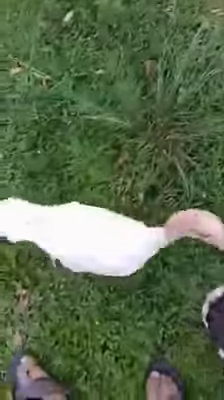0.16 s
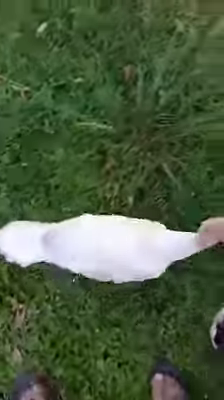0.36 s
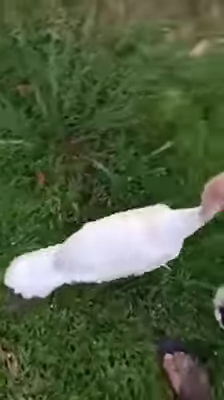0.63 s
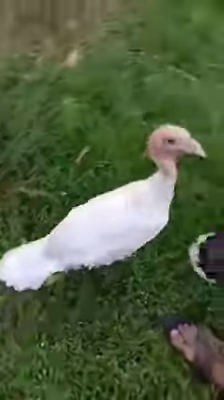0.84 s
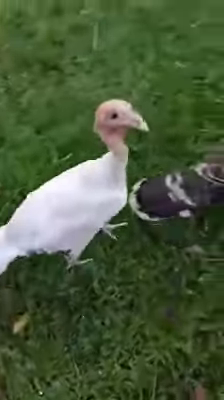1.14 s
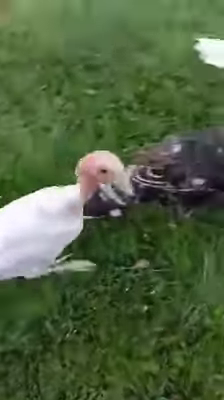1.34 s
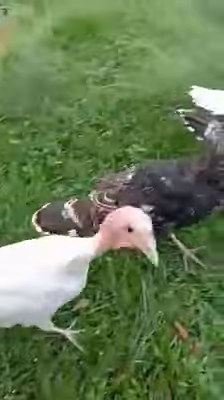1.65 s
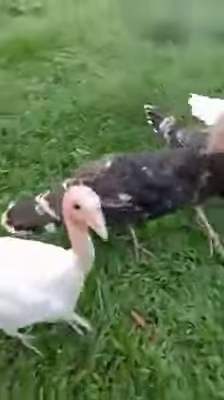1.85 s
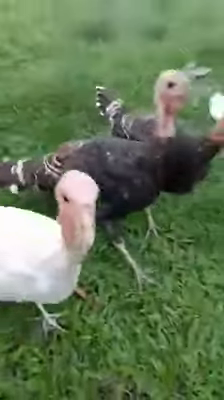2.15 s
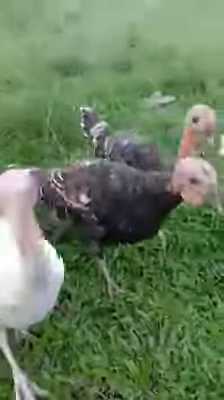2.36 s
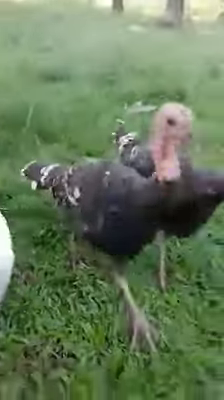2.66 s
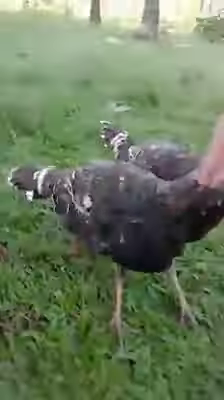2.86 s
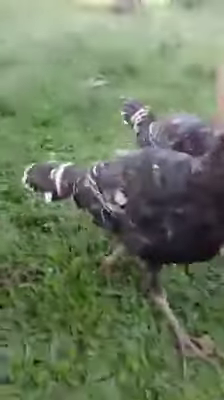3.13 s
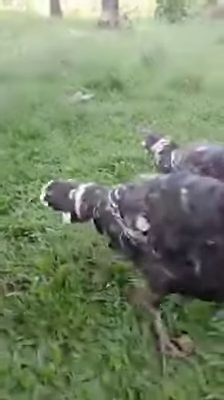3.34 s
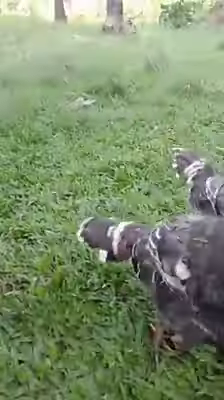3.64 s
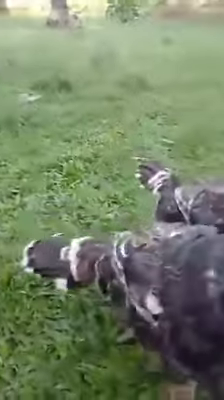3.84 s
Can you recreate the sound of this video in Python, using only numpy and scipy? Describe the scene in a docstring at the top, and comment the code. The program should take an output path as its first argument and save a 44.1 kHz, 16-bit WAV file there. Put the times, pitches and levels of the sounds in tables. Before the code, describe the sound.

Young turkeys whistle and yelp close by, with distant peeps and insects buzzing.

```python
"""A lawn, with young turkeys walking close to the microphone. One whistles, then yelps six times: each
yelp starts as a whistle, breaks into a low register rasping with half-pitch lines, and flips up again.
Others peep farther off, two clucks ring a throat, insects buzz, and grass, handling and footfalls
rustle and bump over a low drone. Trees and ground scatter a faint echo of the birds, and the
recorder's limiter ducks everything under the loud calls."""
import sys
import numpy as np
from scipy import signal
from scipy.fft import rfft, irfft
from scipy.io import wavfile
from scipy.ndimage import uniform_filter1d

SR = 44100
rng = np.random.default_rng(int(sys.argv[2]) if len(sys.argv) > 2 else 0)


def store_wav(level_fs):
    """Save 16-bit WAV to argv[1]."""
    pcm = np.round(np.clip(np.atleast_2d(level_fs), -1, 1) * 32767)
    wavfile.write(sys.argv[1], SR, pcm.T.astype(np.int16))


N = 176400
T = np.arange(N) / SR

# Noise spectra of the insects, the drone, the open air, rustling, breath and the yelp's upper edge.
# Each row: frequency in Hz, relative level in dB.
INSECT_SPECTRUM = [(5400, -17), (6250, 8), (7000, -19), (8300, -23.5), (9100, -5), (10300, -1),
                   (11600, -21)]
DRONE_SPECTRUM = [(80, -5), (128, 8), (165, 5), (260, -24)]
OPEN_AIR_SPECTRUM = [(60, -4.5), (250, 3.5), (1000, 2), (1270, 14), (1600, 1), (4200, 4), (15500, -33)]
RUSTLE_SPECTRUM = [(300, -16.5), (1400, 13), (5500, 1), (12000, -8.5)]
BREATH_SPECTRUM = [(600, -25.5), (1250, 14.5), (2100, 23), (3300, 4), (4000, -1), (4800, -6.5)]
HISS_SPECTRUM = [(7200, 6.5), (14000, -12)]
# Envelope of the insect buzz. Each row: time in seconds, level in dB.
INSECT_ENVELOPE = [(0, -54.5), (1.6, -54.5), (4, -62.5)]
# Far peeps. Each row: start and length in seconds, start and end of the glide in Hz, level in dB.
PEEP_NOTES = [(0.045, 0.15, 4500, 4080, -48), (0.554, 0.18, 3505, 3330, -49), (0.821, 0.2, 3876, 3754, -43),
              (1.074, 0.053, 3150, 2380, -43), (1.111, 0.24, 3840, 3850, -46),
              (1.121, 0.046, 3180, 2380, -40.5), (1.419, 0.19, 3944, 3770, -38.5),
              (1.67, 0.085, 4360, 3610, -40.5)]
# Pops that excite the clucks. Each row: time in seconds, level in dB.
CLUCK_POPS = [(0.491, -38), (2.561, -25.5)]
# Throat modes of a cluck. Each row: frequency in Hz, gain in dB, time to decay by 60 dB in seconds.
THROAT_MODES = [(1223, -4, 0.084), (1970, 5.5, 0.017), (4500, -7.5, 0.012)]
# Bumps and footfalls. Each row: centre and half width in seconds, frequency in Hz, level in dB.
BUMP_PULSES = [(0.564, 0.037, 83.6, -37.5), (0.778, 0.085, 173.2, -48.5), (3.189, 0.085, 122.6, -45.5),
               (3.29, 0.025, 124.5, -37.5)]
# Rustles. Each row: centre and half width in seconds, swish level and crackle level in dB.
RUSTLE_SWELLS = [(1.05, 0.14, -49, -63), (1.798, 0.11, -40.5, -54), (1.987, 0.043, -45.5, -52),
                 (2.263, 0.076, -40, -47.5), (2.547, 0.045, -42.5, -51.5), (3.969, 0.01, -45.5, -52)]
# Near whistles. Each row: start and length in seconds, start, middle and end pitch in Hz,
# level in dB, roughness (0 is smooth).
WHISTLE_NOTES = [(1.239, 0.058, 1610, 1885, 1920, -32.5, 0.71), (1.272, 0.1, 1867, 2020, 1940, -39, 0.05),
                 (1.343, 0.086, 1957, 1814, 1842, -28, 0.16), (1.419, 0.087, 1607, 1485, 1420, -32.5, 0.38),
                 (1.541, 0.021, 1080, 904, 790, -28.5, 1.26), (1.554, 0.02, 1470, 2005, 2410, -15.5, 0.9),
                 (1.558, 0.045, 2144, 2196, 2053, -13.5, 0.05),
                 (1.599, 0.065, 2053, 1958, 1760, -18.5, 0.03), (1.65, 0.022, 1510, 1388, 1330, -29, 0.2),
                 (1.994, 0.038, 1885, 1882, 1780, -14, 0.25), (2.095, 0.027, 1910, 1908, 2540, -9, 0.2),
                 (2.35, 0.041, 2015, 1875, 1750, -20, 0.82), (2.45, 0.023, 1820, 1875, 2020, -16.5, 1.23),
                 (2.679, 0.046, 1755, 1790, 2050, -22.5, 0.97),
                 (2.777, 0.036, 1645, 2004, 2320, -14.5, 0.45), (2.994, 0.047, 1830, 1920, 1920, -20, 0.7),
                 (3.104, 0.025, 1760, 1913, 1940, -7, 0.17), (3.319, 0.052, 1553, 1927, 1990, -10, 0.24),
                 (3.42, 0.034, 1803, 1983, 1620, -12, 0), (3.639, 0.032, 1690, 1737, 1834, 1.5, 0.13),
                 (3.742, 0.13, 1705, 1756, 1850, -6, 0.01), (3.852, 0.027, 2080, 2300, 2530, -27, 0.17),
                 (3.978, 0.037, 1530, 1833, 1850, -18.5, 0.15)]
# Spectral envelopes of a whistle's octave, a yelp's harmonics from the third up, and its half-pitch
# lines. Each row: frequency in Hz, gain in dB.
WHISTLE_OCTAVE_GAINS = [(3000, -8.5), (3450, -40), (4300, -23.5)]
OVERTONE_GAINS = [(3200, -20), (4600, -30), (5400, -61.5)]
RASP_GAINS = [(550, -17), (1650, -9), (2750, -17.5), (3800, -25), (4900, -30.5)]
# Low-register stretches; the last two form one yelp. Each row: break time, length and lead-in in
# seconds, settled pitch in Hz, then in dB: level, dip midway, octave at start and at end, rasp, hiss.
YELP_BREAKS = [(2.02, 0.088, 0.004, 1352, -23.5, -19, -3.5, -9.5, -14, -40.5),
               (2.399, .057, 0.025, 1095, -9, 16.5, 6, 12.5, 4, -31),
               (2.712, 0.073, 0.008, 1087, -2.5, 4, 11.5, -23.5, -3, -46.5),
               (3.035, 0.07, 0.02, 1079, 1, 12, -8, 2.5, -2.5, -51.5),
               (3.35, .076, 0.016, 1100, -5, 5.5, -2, -2, -4, -46.5),
               (3.664, 0.038, .003, 1334, -4, -5, -13.5, -35, -23, -62),
               (3.698, 0.034, 0.0037, 1034, -12, 4.5, 0, 5, -12, -55)]


def from_db(db):
    """Amplitude grows tenfold for every 20 dB."""
    return 10 ** (np.asarray(db) / 20)


def unit_power(x):
    """Division by the RMS value leaves a mean power of one."""
    return x / np.sqrt(np.mean(x ** 2) + 1e-20)


def gain_at(spectrum, hz):
    """A spectral envelope runs straight between its points in dB against log frequency."""
    points_hz, db = np.transpose(spectrum)
    return from_db(np.interp(np.log(hz + 1e-9), np.log(points_hz), db))


def noise(spectrum):
    """Filtering colours white noise; the result has unit power and falls steeply beyond the ends."""
    hz = np.arange(N // 2 + 1) * SR / N + 1
    skirts = np.minimum(1, np.minimum(hz / spectrum[0][0], spectrum[-1][0] / hz)) ** 4
    return unit_power(irfft(rfft(rng.standard_normal(N)) * gain_at(spectrum, hz) * skirts, N))


def drift(rate_hz):
    """Low-pass filtered noise wanders smoothly, here with unit power."""
    pole = np.exp(-2 * np.pi * rate_hz / SR)
    return unit_power(signal.lfilter([1], [1, -2 * pole, pole * pole], rng.standard_normal(N + SR))[SR:])


def phase_of(hz):
    """Phase is the time integral of frequency."""
    return 2 * np.pi * np.cumsum(hz) / SR


def gate(t, start, end, edge):
    """Raised-cosine edges switch a tone on and off without a click."""
    return np.sin(np.pi / 2 * np.clip(np.minimum(t - start, end - t) / edge, 0, 1)) ** 2


def swell(centre, half_width, db):
    """A Gaussian envelope falls to 1/e one half width from its peak."""
    return from_db(db) * np.exp(-((T - centre) / half_width) ** 2)


def background(flutter_db=1.0, drone_db=-52.5, open_air_db=-54):
    """Independent noises add in power: fluttering insect buzz, a far low drone and open-air hiss."""
    insect_db = np.interp(T, *np.transpose(INSECT_ENVELOPE))
    insects = noise(INSECT_SPECTRUM) * from_db(insect_db + flutter_db * drift(40))
    drone = from_db(drone_db) * noise(DRONE_SPECTRUM)
    return insects + drone + from_db(open_air_db) * noise(OPEN_AIR_SPECTRUM)


def peeps(scoop_share=0.059, waver_share=0.0073, flutter_db=4.5):
    """Frequency and amplitude modulation make thin, far tones scoop up, waver and fade."""
    out, waver, flutter = np.zeros(N), drift(180), drift(70)
    for start, length, start_hz, end_hz, db in PEEP_NOTES:
        span = (T > start) & (T < start + length)
        progress = (T[span] - start) / length
        glide = start_hz + (end_hz - start_hz) * progress
        pitch = glide * (1 - scoop_share * np.exp(-10 * progress) + waver_share * waver[span])
        envelope = from_db(db + flutter_db * flutter[span]) * np.sin(np.pi * progress ** 0.49)
        out[span] += envelope * np.sin(phase_of(pitch))
    return out


def clucks():
    """Impulse response: a single pop rings the throat's modes, each a damped sinusoid."""
    pops, out = np.zeros(N), np.zeros(N)
    for start, db in CLUCK_POPS:
        pops[int(start * SR)] = from_db(db)
    for hz, db, t60 in THROAT_MODES:
        radius, angle = np.exp(-np.log(1000) / (t60 * SR)), 2 * np.pi * hz / SR
        feedback = [1, -2 * radius * np.cos(angle), radius ** 2]
        out += from_db(db) * signal.lfilter([0, np.sin(angle)], feedback, pops + 1e-18)
    return out


def bumps(wander_share=0.309):
    """Footfalls and soft bumps on the recorder: random frequency modulation blurs low tones to thuds."""
    out = np.zeros(N)
    for centre, half_width, hz, db in BUMP_PULSES:
        pitch = hz * (1 + wander_share * drift(77))
        out += swell(centre, half_width, db) * np.sqrt(2) * np.sin(phase_of(pitch))
    return out


def rustles(grain_db=2.5, snaps_per_s=1200, spread_db=12, snap_s=0.00085):
    """Grass and handling give a grainy swish and shot noise, a crackle of brief random snaps."""
    swish = unit_power(noise(RUSTLE_SPECTRUM) * from_db(grain_db * drift(400)))
    snaps = (rng.random(N) < snaps_per_s / SR) * from_db(-spread_db * rng.standard_normal(N))
    bursts = signal.lfilter([1], [1, -np.exp(-1 / (snap_s * SR))], snaps) * rng.standard_normal(N)
    crackle = unit_power(signal.sosfilt(signal.butter(1, 4000, "high", fs=SR, output="sos"), bursts))
    return sum(swish * swell(centre, half_width, swish_db) + crackle * swell(centre, half_width, crackle_db)
               for centre, half_width, swish_db, crackle_db in RUSTLE_SWELLS)


def whistles(jitter_share=0.03, breath_db=-7, swell_db=2.5):
    """Nearly sinusoidal oscillation on an arched pitch; jitter and breath noise make it rough."""
    out, breath, jitter = np.zeros(N), noise(BREATH_SPECTRUM), drift(450)
    for start, length, start_hz, mid_hz, end_hz, db, roughness in WHISTLE_NOTES:
        span = (T > start) & (T < start + length)
        progress = (T[span] - start) / length
        arch = np.sin(np.pi * progress)
        pitch = start_hz + (end_hz - start_hz) * progress + (mid_hz - (start_hz + end_hz) / 2) * arch
        phase = phase_of(pitch * (1 + jitter_share * roughness * jitter[span]))
        voice = np.sin(phase) + gain_at(WHISTLE_OCTAVE_GAINS, 2 * pitch) * np.sin(2 * phase)
        voice += roughness * from_db(breath_db) * breath[span]
        edges = gate(T[span], start, start + length, edge=0.011)
        out[span] += voice * from_db(db + swell_db * (arch - 0.5)) * edges
    return out


def yelps():
    """Register break: the voice drops, gains an octave and a period-doubling rasp, then flips back up."""
    break_hz, flip_hz = 1325, 1273   # least pitch before the break and after the flip
    break_s, flip_s, edge_s = 0.0026, 0.0024, 0.01
    sag_share, jitter_share, scatter_rad, shimmer_db = 0.0628, 0.013, 0.11, 2
    whistle_octave_db, rasp_growth_db, rise_db_per_s, fall_db_per_s = -23, 6, 250, 720
    out, breath, jitter = np.zeros(N), noise(BREATH_SPECTRUM), drift(450)
    hiss, scatter = noise(HISS_SPECTRUM), scatter_rad * drift(900)
    shimmer = from_db(shimmer_db * np.array([drift(60) for _ in range(3)]))
    for start, length, lead_in, hz, db, dip_db, first_db, last_db, rasp_db, hiss_db in YELP_BREAKS:
        lead_out = 0.012 if hz < flip_hz else 0
        span = (T > start - lead_in - edge_s) & (T < start + length + lead_out + edge_s)
        t = T[span] - start
        progress = np.clip(t / length, 0, 1)
        before = 0.5 - 0.5 * np.tanh(t / break_s / 2)
        after = 0.5 + 0.5 * np.tanh((t - length) / flip_s / 2)
        low = 1 - before - after   # weight of the low register
        pitch = hz * (1 + sag_share * (1 - progress) ** 1.924)   # starts sharp and settles
        pitch += before * np.maximum(break_hz - pitch, 0) + after * np.maximum(flip_hz - pitch, 0)
        phase = phase_of(pitch * (1 + jitter_share * jitter[span]))
        uneven = phase + scatter[span]
        octave_db = low * (first_db + (last_db - first_db) * progress) + (1 - low) * whistle_octave_db
        octave = from_db(octave_db) * np.cos(2 * phase)
        tone = shimmer[0, span] * np.sin(phase) + shimmer[1, span] * octave
        overtones = sum(gain_at(OVERTONE_GAINS, k * pitch) * np.sin(k * uneven) for k in range(3, 7))
        rasp = sum(gain_at(RASP_GAINS, k * pitch) * np.sin(k * uneven) for k in np.arange(5) + 0.5)
        rasp *= shimmer[2, span] * from_db(rasp_db + rasp_growth_db * (progress - 0.5))
        breath_db = -16.8 + 0.5 * rasp_db - 1.35 * low
        air = from_db(breath_db) * breath[span] + low * from_db(hiss_db) * hiss[span]
        puffs = 1 + np.cos(phase / 2)   # one every second cycle
        voice = tone + low * (overtones + rasp) + air * puffs
        fade_db = rise_db_per_s * np.maximum(-t, 0) + fall_db_per_s * np.maximum(t - length, 0)
        edges = gate(t, -lead_in - edge_s / 2, length + lead_out + edge_s / 2, edge_s)
        out[span] += voice * from_db(db - dip_db * np.sin(np.pi * progress) - fade_db) * edges
    return out


def echoes(birds, gain_db=-25.5, t60_s=0.55, build_s=0.0086, band_hz=(1380, 5000)):
    """Diffuse scattering from trees and ground adds a faint, fluctuating, exponentially decaying tail."""
    t = T[:SR]
    tail = rng.standard_normal(SR) * np.exp(-np.log(1000) * t / t60_s) * np.minimum(t / build_s, 1) ** 2
    tail /= np.sqrt(np.sum(tail ** 2))
    tail = signal.sosfilt(signal.butter(2, band_hz, "band", fs=SR, output="sos"), tail)
    return from_db(gain_db) * signal.fftconvolve(birds * (0.5 + drift(120)), tail)[:N]


def scene():
    """Superposition: background, birds, bumps, rustles and echoes add in one channel."""
    birds = peeps() + clucks() + whistles() + yelps()
    return (background() + birds + bumps() + rustles() + echoes(birds))[None]


def record(dry, threshold_db=-20.5, ratio=4.26, release_db_per_s=496.5, detect_s=0.011):
    """Compression: a fast limiter lowers the gain on loud calls; filters cut the deep bass and the top."""
    window = int(detect_s * SR)
    level_db = 10 * np.log10(np.maximum(uniform_filter1d(dry[0] ** 2, window), 1e-12))
    cut_db = np.maximum(level_db - threshold_db, 0) * (1 - 1 / ratio)
    held_db = np.maximum.accumulate(cut_db + release_db_per_s * T) - release_db_per_s * T
    limited = dry * from_db(-uniform_filter1d(held_db, window))
    limited = signal.sosfilt(signal.butter(4, 47, "high", fs=SR, output="sos"), limited)
    return signal.sosfilt(signal.ellip(10, 0.1, 80, 15800, fs=SR, output="sos"), limited)


dry = scene()
out = record(dry)
store_wav(out)
```